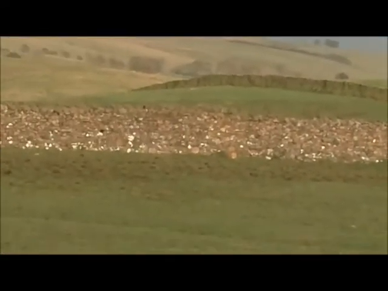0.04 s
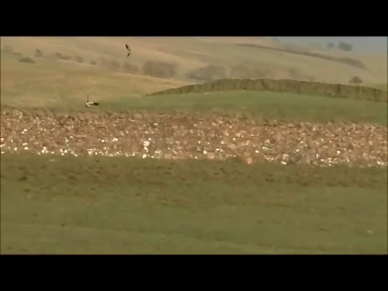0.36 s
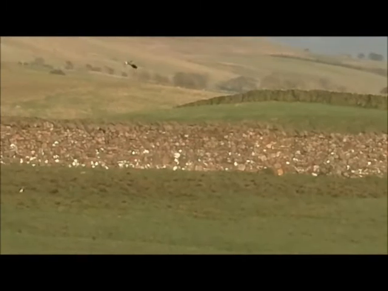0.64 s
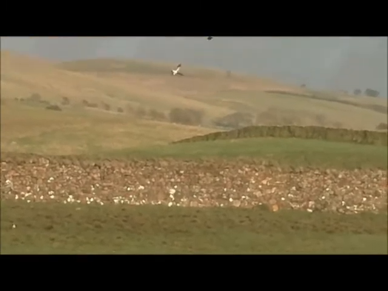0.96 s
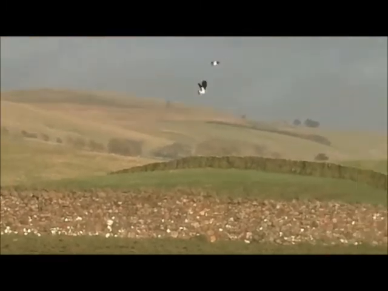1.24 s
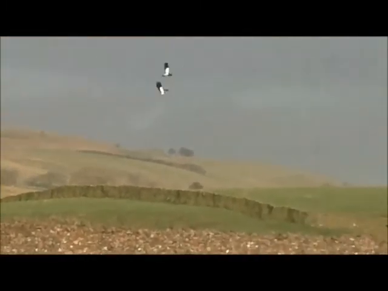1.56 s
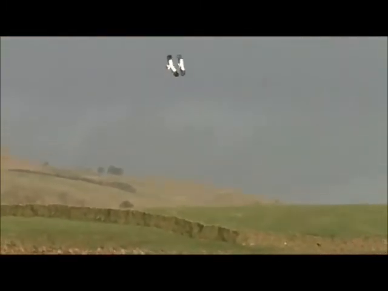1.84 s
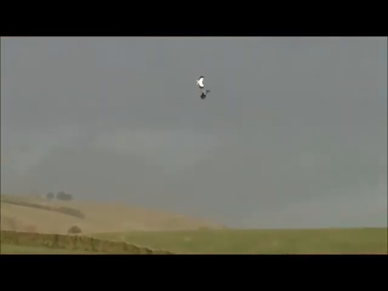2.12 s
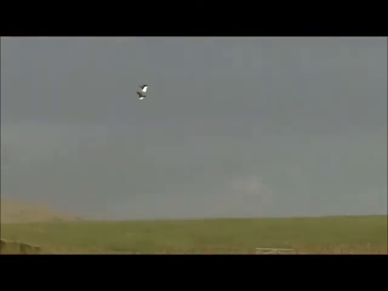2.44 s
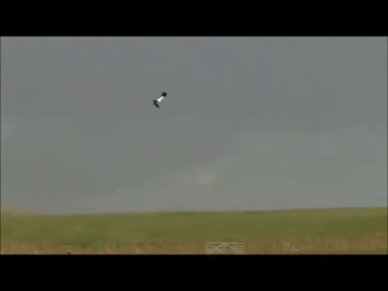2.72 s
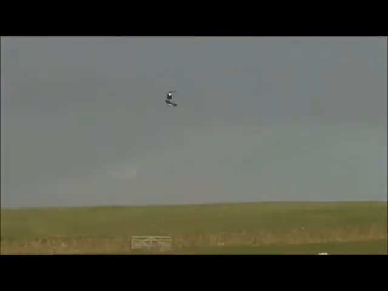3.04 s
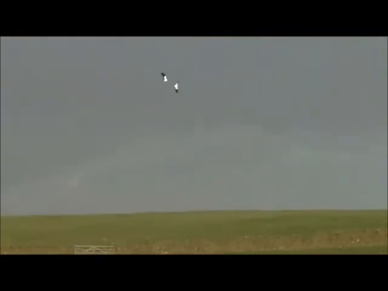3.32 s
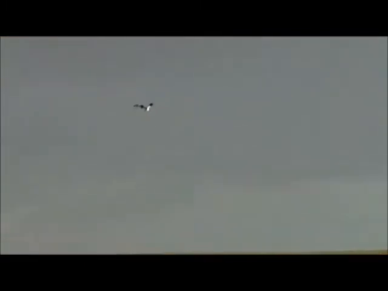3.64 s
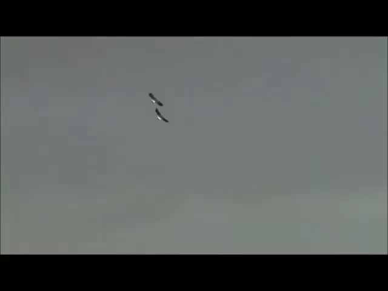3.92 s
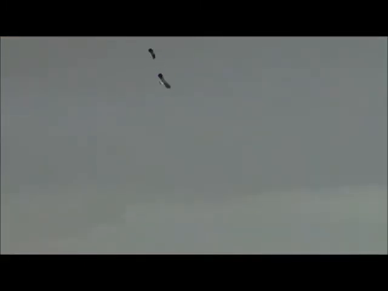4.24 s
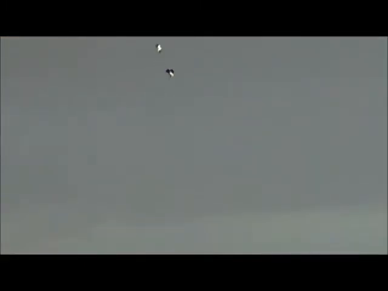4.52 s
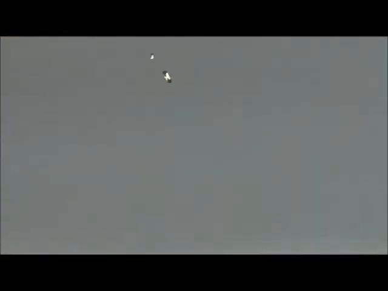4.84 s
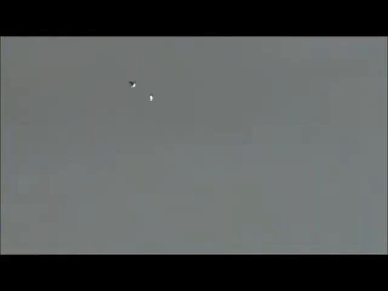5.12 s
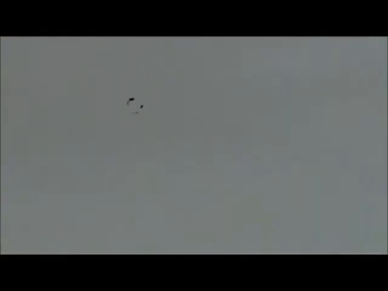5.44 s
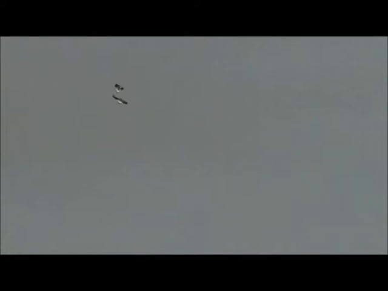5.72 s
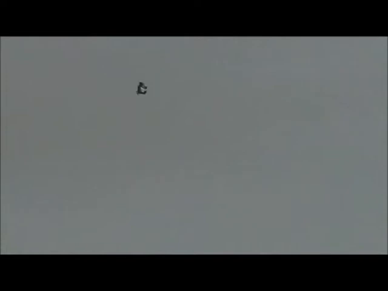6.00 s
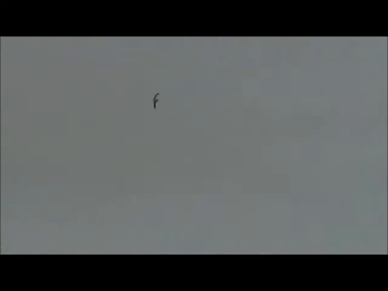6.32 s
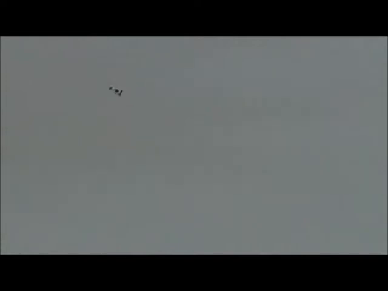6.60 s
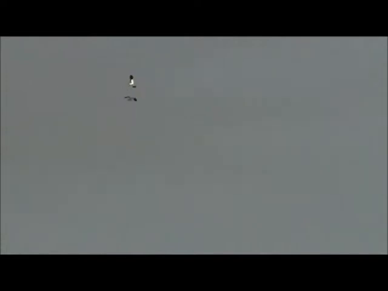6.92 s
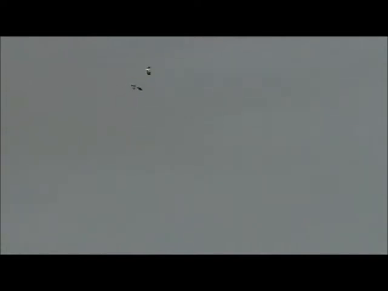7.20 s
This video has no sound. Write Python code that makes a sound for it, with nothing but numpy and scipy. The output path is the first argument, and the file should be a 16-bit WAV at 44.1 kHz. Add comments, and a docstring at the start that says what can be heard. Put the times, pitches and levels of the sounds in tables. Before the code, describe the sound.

On open pasture, air rushes softly over the grass above a distant engine's low drone. After about two seconds, gusts hit the microphone with a deep, uneven rumble, the hardest ones thumping and briefly overloading it. Small birds chirp faintly, the camera takes one soft bump, and near the end a distant lapwing gives two reedy calls under the wind. Faint camera hiss and whine run throughout.

```python
"""Open upland pasture in wind: air rushes over the fields, a far engine drones, a lapwing gives two
reedy calls and small birds chirp faintly. From about two seconds on, gusts push on the two
microphone openings and make them rumble; the hardest swirls of air overload them.
The camcorder's moving parts tick and whine faintly, and its body takes one soft bump."""
import sys
import numpy as np
from scipy import signal
from scipy.fft import rfft, irfft, next_fast_len
from scipy.io import wavfile
from scipy.ndimage import uniform_filter1d, map_coordinates

SR = 44100
rng = np.random.default_rng(int(sys.argv[2]) if len(sys.argv) > 2 else 0)


def to_wav(s):
    """Save 16-bit WAV."""
    ch = np.atleast_2d(s).T  # columns
    pcm = np.round(np.clip(ch, -1, 1) * 32767)  # PCM
    wavfile.write(sys.argv[1], SR, pcm.astype(np.int16))


N = 320166


def wind_on_microphones(rumble_db=2, churn_db=-17, churn_power=1.72, reference_db=-15, unrest_db=2):
    """Gusts push on each opening: a deep rumble, and a higher churn that grows faster than the gust."""
    # strength of the wind: t/s, level/dB, left minus right/dB
    gusts = [(2.25, -56, 0), (2.53, -31, 0), (2.7, -43, -2), (3.04, -34.5, 3), (3.14, -17.5, 5),
             (3.66, -18, -4.5), (3.76, -24, 1.5), (4.14, -28.5, -6.5), (4.56, -33.5, 4), (4.8, -17.5, -1.5),
             (5.08, -27.5, -3.5), (5.52, -35.5, -3.5), (5.9, -23.5, -1.5), (6.3, -25, -7.5),
             (6.82, -33.5, -3), (7.04, -25, 1.5), (7.26, -17.5, 13)]
    # separate puffs: middle t/s, hold/s, level/dB, left minus right/dB
    puffs = [(2.355, 0.031, -29.5, 19), (2.832, 0.043, -22.5, 12), (3.011, 0.01, -23, 3),
             (3.201, .17, -14.5, -2.5), (3.632, 0.13, -12.5, -0.5), (3.813, 0.038, -16.5, 6),
             (3.992, .13, -18, 2), (4.188, .025, -26.5, -19), (4.386, 0.077, -24, 0),
             (4.655, 0.032, -15.5, 3.5), (4.795, 0.01, -20.5, -17), (4.948, 0.082, -20, -11),
             (6.223, 0.091, -27, -3), (6.648, .04, -19, 0), (6.894, 0.016, -24, 20),
             (6.999, 0.056, -15.5, 10), (7.102, 0.027, -19, -3.5)]
    # tone colour of the rumble: f/Hz, relative level/dB
    rumble_spectrum = [(10, 4), (25, 2.5), (45, 6.5), (80, -1), (125, -14), (180, -44), (260, -52),
                       (400, -65.5), (800, -46.5), (2000, -110)]
    # tone colour of the churn: f/Hz, relative level/dB
    churn_spectrum = [(40, -4), (90, 18.5), (140, 9), (220, -3.5), (330, -17.5), (480, -28.5), (700, -40.5),
                      (1500, -39.5), (4000, -48.5), (12000, -57)]
    fade_in = np.clip((clock() - gusts[0][0]) / .11, 0, 1)
    gust_db, gust_pan_db = curves(gusts)
    unrest = amp(unrest_db * np.array([wobble(16), wobble(16)]))
    gust_force = fade_in * amp(gust_db) * sides(gust_pan_db) * unrest
    puff_force = sum(amp(db) * sides(pan_db) * puff(s, hold) for s, hold, db, pan_db in puffs)
    force = np.hypot(gust_force, puff_force)
    flow = noise(rumble_spectrum, shared=0)
    # within a gust the pressure swings keep a fairly even size
    local_power = np.abs(uniform_filter1d(flow ** 2, size=3500, axis=1))
    rumble = amp(rumble_db) * force * unit(flow / np.sqrt(local_power + 1e-6))
    churn_gain = amp(churn_db) * (force / amp(reference_db)) ** churn_power
    return rumble + churn_gain * noise(churn_spectrum, shared=0)


def puff(middle_s, hold_s, rise_s=.015, fall_s=.016):
    """The strength of one puff of air: it rises quickly, holds, then dies away."""
    t = clock() - middle_s
    before = np.maximum(-t - hold_s / 2, 0) / rise_s
    after = np.maximum(t - hold_s / 2, 0) / fall_s
    return np.exp(-np.minimum(before + after, 10) ** 2)


def eddies(rise_s=.0011, fall_s=.0022, swirl_db=-11, swirl_s=.009):
    """A small whirl of air crosses an opening: one steep swing of pressure inside a short, rough swirl."""
    # passing whirls: t/s, level/dB, left minus right/dB
    whirls = [(3.121, -10, 28), (3.208, -8.5, -2), (3.279, -10, -4.5), (3.574, -4.5, -26),
              (3.593, -8.5, -21), (3.612, -3.5, 5), (3.635, -14, 9), (3.687, -6.5, -19), (4.047, -15, -22),
              (4.884, -21.5, 20), (4.958, -21.5, -16), (5.121, -26.5, -20), (6.374, -23.5, -20),
              (6.629, -26, 5), (6.978, -19, 20), (7.097, -19, -15)]
    # tone colour of the swirl: f/Hz, relative level/dB
    swirl_spectrum = [(50, -8), (120, 2), (220, 1.5), (330, -7), (480, -16.5), (700, -21.5), (1000, -26.5),
                      (1600, -35), (2900, -41.5), (4000, -42), (6000, -59), (12000, -54)]
    out = np.zeros((2, N))
    swirl_noise = amp(swirl_db) * noise(swirl_spectrum, shared=.37)
    for (s, db, pan_db), sign in zip(whirls, rng.choice([-1, 1], len(whirls))):
        near = slice(int((s - .05) * SR), int((s + .05) * SR))
        t = clock()[near] - s
        offset = t / np.where(t < 0, rise_s, fall_s)
        swing = sign * (1 - offset ** 2) * np.exp(-offset ** 2 / 2)
        swirl = swirl_noise[:, near] * np.exp(-(t / swirl_s) ** 2)
        out[:, near] += amp(db) * sides(pan_db) * (swing + swirl)
    return out


def wind_over_fields():
    """Wind roars far over the land, rustles in the nearby grass and adds a hollow moan."""
    # strength of the breeze: t/s, roar level/dB, relative grass level/dB
    breeze = [(0, -48, -58), (.6, -49, -56.5), (1.8, -53.5, -58), (2.35, -51.5, -57.5),
              (2.73, -53.5, -51.5), (3.05, -50, -57.5), (3.42, -52, -48), (4.4, -50.5, -50.5),
              (4.75, -50.5, -49), (5.5, -48.5, -51), (6.45, -49.5, -51.5), (7.2, -50, -54)]
    # tone colour of the roar: f/Hz, relative level/dB
    roar_spectrum = [(100, -12), (250, -12), (450, -5), (650, -1.5), (820, 1.5), (1080, 0.5), (1350, -3.5),
                     (1800, -14), (2600, -33), (5000, -36)]
    # tone colour of the grass: f/Hz, relative level/dB
    grass_spectrum = [(500, -9), (900, -8.5), (1150, -1), (1450, 0.5), (1820, 2.5), (2150, -5), (2500, -8),
                      (3000, -16.5), (4200, -26.5), (8000, -34.5)]
    # the moan, higher where the wind is faster: t/s, centre f/Hz, relative level/dB
    moan_path = [(0, 962, -55), (.55, 992, -52.5), (1.8, 982, -60), (3.2, 1105, -57), (4.35, 1112, -47.5),
                 (5.6, 1078, -54.5), (6.7, 930, -61)]
    # tone colour of the moan: distance from its centre/Hz, relative level/dB
    moan_band = [(30, 8.5), (70, 0.5), (120, 4), (220, -7.5), (1000, -68), (4000, -120)]
    roar_db, grass_db = curves(breeze)
    roar = amp(roar_db + .59 * wobble(6.1)) * noise(roar_spectrum, shared=.78)
    grass = amp(grass_db + 3 + .42 * wobble(8)) * noise(grass_spectrum, shared=.64)
    centre_hz, moan_db = curves(moan_path)
    phase = 2 * np.pi * np.cumsum(centre_hz) / SR
    # shift low noise up into a narrow band around the centre
    moan = noise(moan_band, shared=1) * np.cos(phase) + noise(moan_band, shared=1) * np.sin(phase)
    return (roar + grass + amp(moan_db - 1) * moan) * sides(-1.1)


def lapwing():
    """A lapwing calls twice: a short, duller falling note, then a longer one that dips and climbs."""
    # pitch turns of the first call: t/s, f/Hz
    short_call = [(5.785, 1040), (5.825, 975), (5.875, 966), (5.96, 915)]
    # pitch turns of the second call: t/s, f/Hz
    long_call = [(6.6, 984), (6.685, 858), (6.752, 1040), (6.772, 1030), (6.824, 1184), (6.882, 1120),
                 (6.942, 1220), (6.975, 1160)]
    first = lapwing_note(short_call, level_db=-54.5, rise_s=.035, fall_s=.052, tilt_db=-4, flutter_db=3.5)
    second = lapwing_note(long_call, level_db=-54.3, rise_s=.17, fall_s=.03, tilt_db=-.3, flutter_db=3)
    return first + second


def lapwing_note(call, level_db, rise_s, fall_s, tilt_db, flutter_db, jitter=.006):
    """A reedy, sliding note: odd overtones lead, and even ones fill in halfway as the voice opens."""
    # the bird's voice: multiple of the pitch, relative level/dB
    overtones = [(2, -16), (3, -2), (4, -2), (5, -1), (6, -15)]
    start, end, t = call[0][0], call[-1][0], clock()
    envelope = np.clip((t - start) / rise_s, 0, 1) * np.clip((end - t) / fall_s, 0, 1) ** 2
    progress = (t - start) / (end - start)
    even_db = -14 * np.clip(.5 + (.5 - progress) / .15, 0, 1)
    pitch = glide(call)
    hoarseness = 1 + 2.8 * np.exp(-((t - start) / .093) ** 2)  # the pitch shakes more at first
    slope_db = tilt_db + np.interp(pitch, [850, 1000], [-3, 0])  # low notes are duller
    phase = 2 * np.pi * np.cumsum(pitch * (1 + jitter * hoarseness * wobble(250))) / SR
    on = envelope > 0
    voice = np.zeros(N)
    for k, db in overtones:
        overtone_db = db + slope_db[on] * max(k - 3, 0) + (k % 2 == 0) * even_db[on]
        voice[on] += amp(overtone_db + flutter_db * wobble(70)[on]) * np.sin(k * phase[on])
    return amp(level_db) * envelope * voice


def far_engine(rumble_db=-39, drift=.0049, fading_db=2):
    """A distant engine drones over a low rumble; moving air makes each tone fade and return."""
    # tones of the drone: f/Hz, level/dB
    tones = [(77.5, -53.5), (155, -53.5), (232, -59.5), (310, -84)]
    # tone colour of the rumble: f/Hz, relative level/dB
    rumble_spectrum = [(12, 0), (28, 3), (42, -4), (63, 3.5), (88, -3.5), (110, -11), (180, -14),
                       (260, -19), (400, -25.5), (900, -47)]
    engine_time = np.cumsum(1 + drift * wobble(3)) / SR  # its speed wanders a little
    drone = np.zeros(N)
    for hz, db in tones:
        drone += amp(db + fading_db * wobble(7.2)) * np.sqrt(2) * np.sin(2 * np.pi * hz * engine_time)
    return drone + amp(rumble_db) * noise(rumble_spectrum, shared=.61)


def far_birds(life_s=.02, rasp=.05, fall_per_s=1.5):
    """Short falling chirps, made hoarse by a fast random waver of pitch."""
    # faint chirps: t/s, f/Hz, level/dB
    chirps = [(4.185, 4640, -63), (4.45, 3240, -57), (4.6, 3430, -58), (4.67, 2840, -57), (4.75, 3270, -59),
              (6.35, 3950, -66), (6.425, 3950, -61)]
    out = np.zeros(N)
    waver = rasp * wobble(700)
    for s, hz, db in chirps:
        near = np.abs(clock() - s) < 3 * life_s
        t = clock()[near] - s
        phase = 2 * np.pi * np.cumsum(hz * (1 - fall_per_s * t + waver[near])) / SR
        out[near] += amp(db) * np.exp(-(t / life_s) ** 2) * np.sqrt(2) * np.sin(phase)
    return out


def bump(at_s=5.487, body_hz=360, level_db=-41, life_s=.0099):
    """One soft, hollow bump on the camcorder's body."""
    t = clock() - at_s
    return amp(level_db) * np.exp(-(t / life_s) ** 2) * np.sin(2 * np.pi * body_hz * t)


def camcorder(tick_db=-62.5, drum_db=-67, whine_db=-72, hiss_db=-56, whine_hz=12887, turns_per_s=30):
    """The lens drive ticks, the tape drum chatters and a motor's whine swells once a turn, over hiss."""
    # ringing of the lens drive: f/Hz, width/Hz, relative level/dB
    lens_modes = [(9110, 350, 4.5), (10200, 900, -21), (14400, 390, 1)]
    # ringing of the tape drum: f/Hz, width/Hz, relative level/dB
    drum_modes = [(13900, 840, 0)]
    # tone colour of the hiss: f/Hz, relative level/dB
    hiss_spectrum = [(300, -24), (2500, 4), (5000, 1), (6800, 0), (7700, -11.5), (8600, 0), (10300, 1),
                     (11800, -3), (13300, 2), (14400, -6), (15500, -32)]
    surge = 1 + .17 * np.cos(2 * np.pi * 10 * (clock() - .075))  # ten swells a second
    load = amp(1.1 * wobble(25)) * surge
    ticks = load * ring(scrapes(per_second=100, life_s=.0015, uneven=.95, rub=.12), lens_modes)
    chatter = np.array([scrapes(per_second=150, life_s=.001, uneven=.81, rub=.08) for _ in range(2)])
    drum = load * ring(chatter, drum_modes)
    throb = 1 + np.cos(2 * np.pi * turns_per_s * (clock() - .021))
    whine = throb * np.sin(2 * np.pi * whine_hz * clock() + .7 * wobble(60)) * sides(-5)
    hiss = noise(hiss_spectrum, shared=.014) * sides(-1.2)
    return amp(tick_db) * ticks * sides(-1.7) + amp(drum_db) * drum + amp(whine_db) * whine + amp(hiss_db) * hiss


def scrapes(per_second, life_s, uneven, rub):
    """Evenly spaced tiny noise bursts of uneven size, on top of steady rubbing."""
    starts = np.arange(0, N, SR / per_second).astype(int)
    kicks = np.bincount(starts, 1 - uneven * rng.random(len(starts)), N)
    decays = signal.lfilter([1], [1, -np.exp(-1 / (life_s * SR))], kicks)
    return (rub + decays) * rng.standard_normal(N)


def ring(x, modes):
    """Let x set a part ringing at its own frequencies; the result has average power 1."""
    def response(f):
        return sum(amp(db) * 1j * f * width / (hz * hz - f * f + 1j * f * width) for hz, width, db in modes)
    return unit(filtered(x, response))


def noise(spectrum, shared):
    """Stereo noise with the given tone colour; shared (0 to 1) is how much both sides have in common."""
    white = np.sqrt(shared) * rng.standard_normal(N) + np.sqrt(1 - shared) * rng.standard_normal((2, N))
    hz, db = np.transpose(spectrum)
    return unit(filtered(white, lambda f: amp(np.interp(np.log(f + 1), np.log(hz), db))))


def filtered(x, response):
    """Turn each frequency in x up or down by response(frequency)."""
    size = next_fast_len(N + SR // 2)
    return irfft(rfft(x, size) * response(np.fft.rfftfreq(size, 1 / SR)), size)[..., :N]


def glide(points):
    """Ease from each pitch turn to the next, one value per sample."""
    s, hz = np.transpose(points)
    count = np.arange(len(s))
    whole, part = np.divmod(np.interp(clock(), s, count), 1)
    return np.interp(whole + (1 - np.cos(np.pi * part)) / 2, count, hz)


def curves(rows):
    """Join a table's rows with straight lines: one curve for each column after the time."""
    s, *columns = np.transpose(rows)
    return [np.interp(clock(), s, column) for column in columns]


def wobble(rate):
    """A smooth curve through rate random values a second."""
    return map_coordinates(rng.standard_normal(int(N * rate / SR) + 4), [clock() * rate])


def sides(pan_db):
    """Left and right gains, pan_db apart, with constant total power."""
    gains = amp(np.array([[.5], [-.5]]) * pan_db)
    return gains / np.sqrt(np.mean(gains ** 2, axis=0))


def amp(db):
    """Decibels to gain."""
    return 10 ** (np.asarray(db) / 20)


def unit(x):
    """Scale to an average power of 1."""
    return x / np.sqrt(np.mean(x ** 2) + 1e-20)


def clock():
    """The time of every sample, in seconds."""
    return np.arange(N) / SR


def scene():
    """Wind, birds and engine, together with the camcorder's own small sounds."""
    calls = lapwing()
    wind = wind_on_microphones() + eddies() + wind_over_fields()
    return wind + calls + far_engine() + far_birds() + bump() + camcorder()


def record(dry, hardness=12, top_hz=15400):
    """Overload rounds off the hardest gusts at full scale; everything above top_hz is cut."""
    rounded = dry / (1 + np.abs(dry) ** hardness) ** (1 / hardness)
    return filtered(rounded, lambda hz: hz < top_hz)


dry = scene()
out = record(dry)
to_wav(out)
```